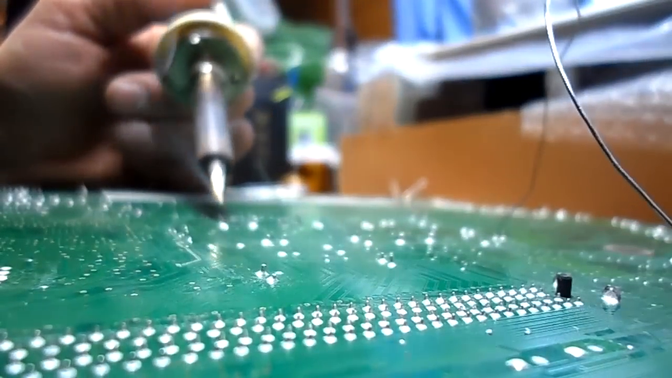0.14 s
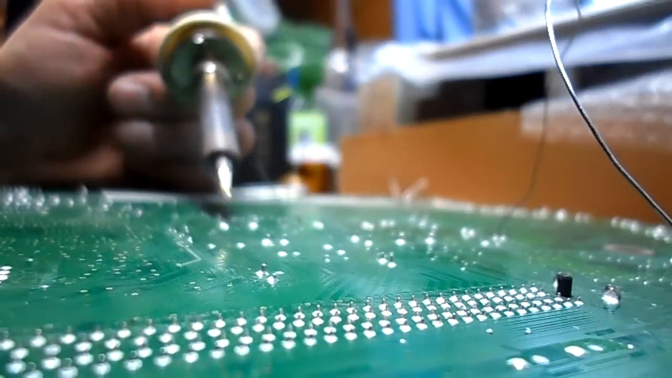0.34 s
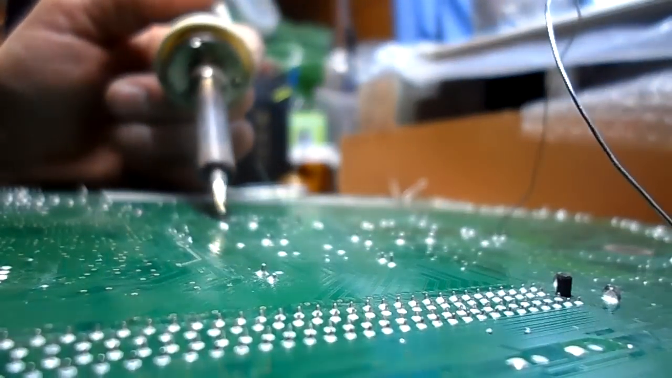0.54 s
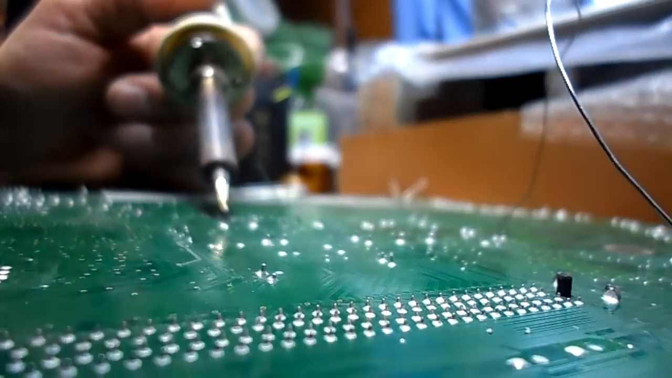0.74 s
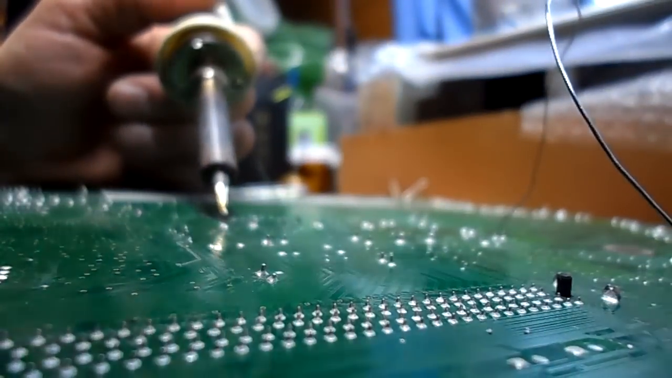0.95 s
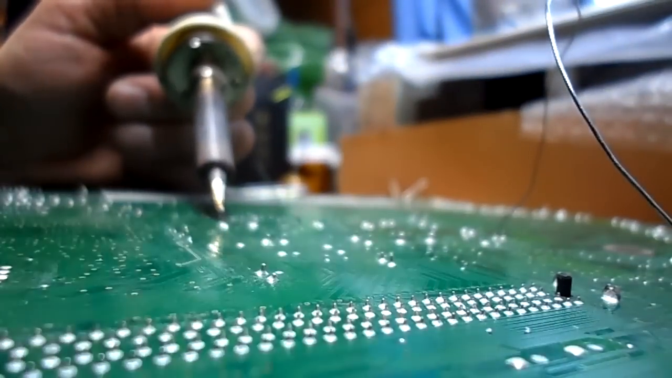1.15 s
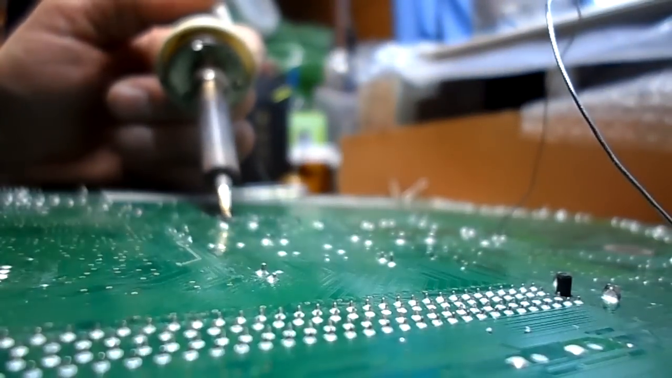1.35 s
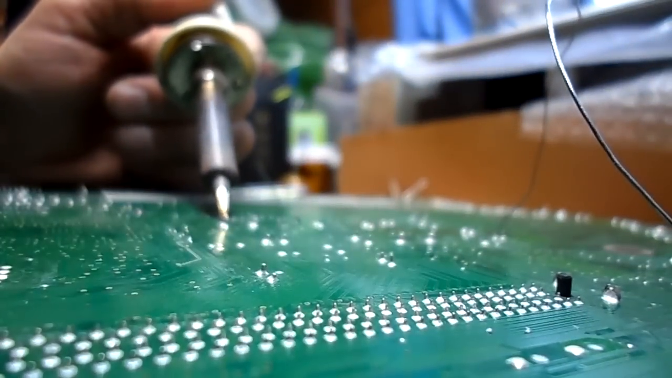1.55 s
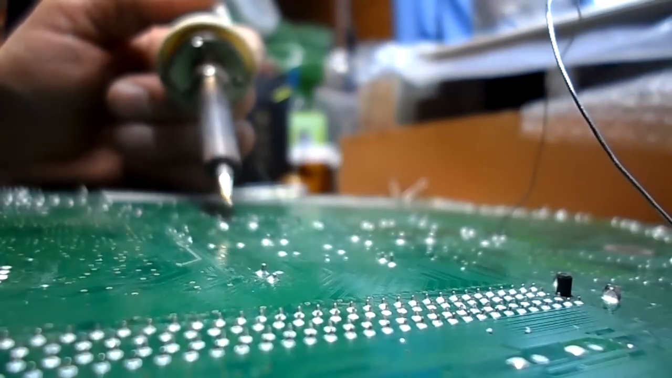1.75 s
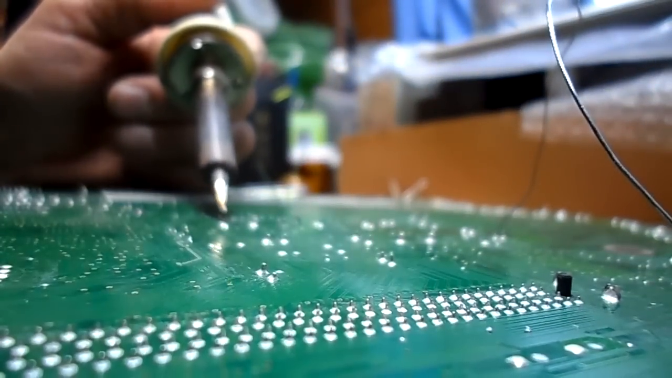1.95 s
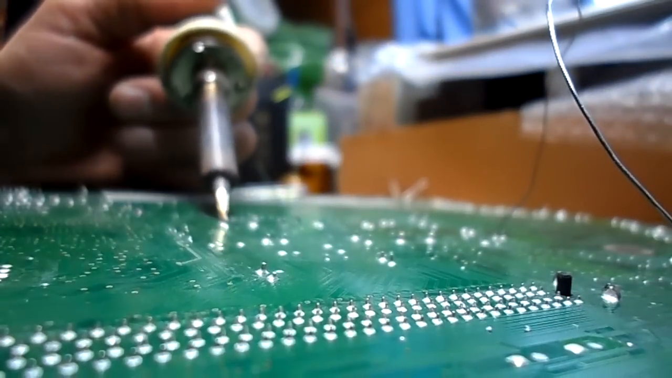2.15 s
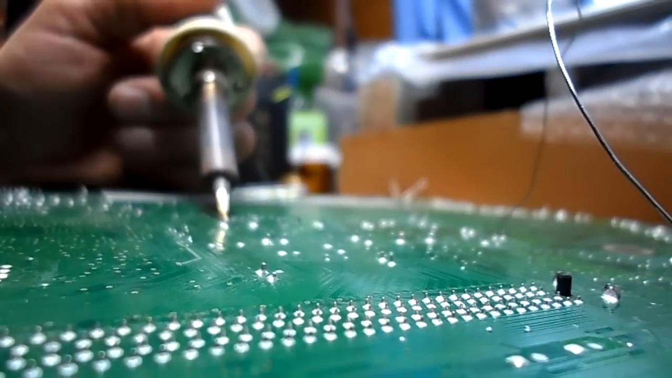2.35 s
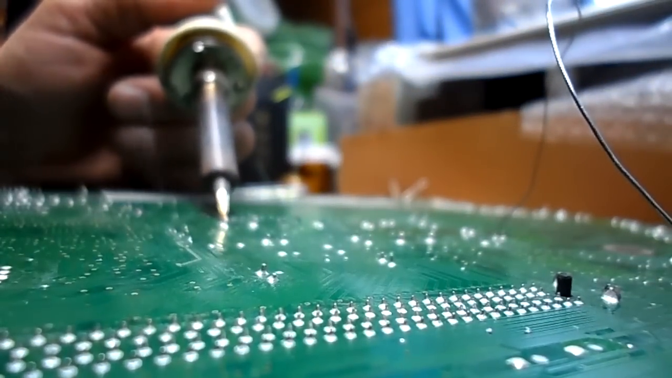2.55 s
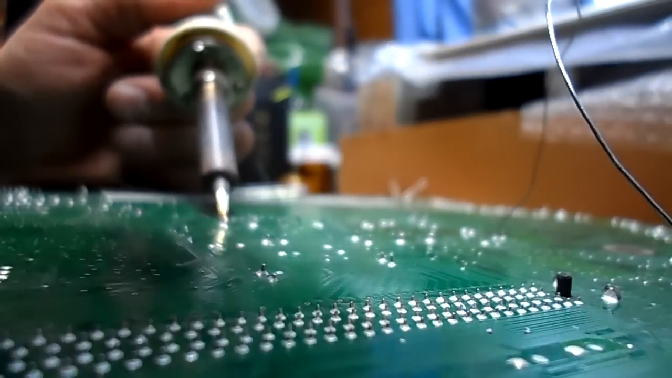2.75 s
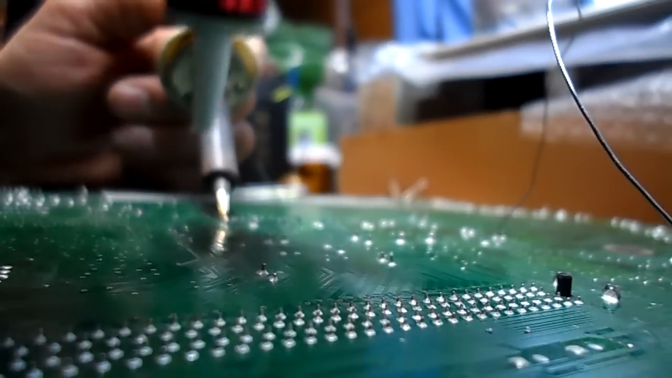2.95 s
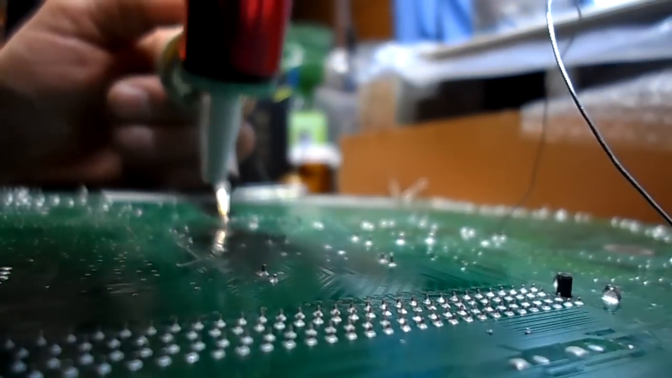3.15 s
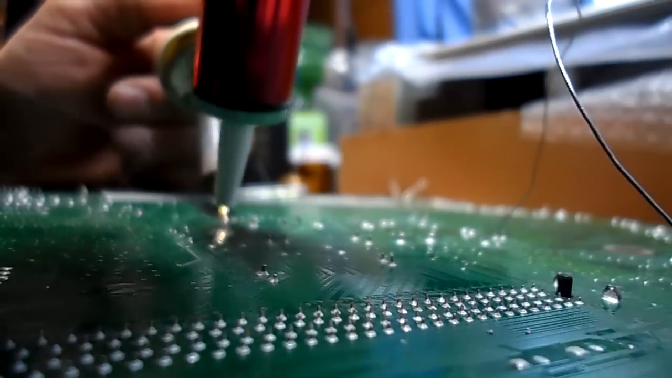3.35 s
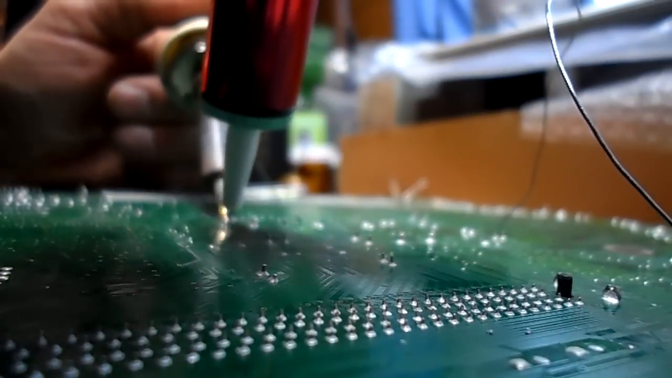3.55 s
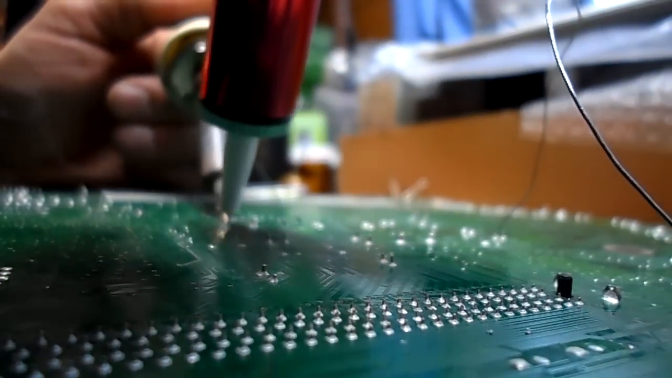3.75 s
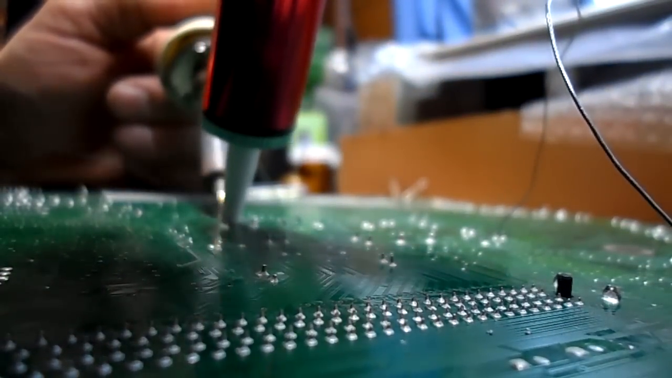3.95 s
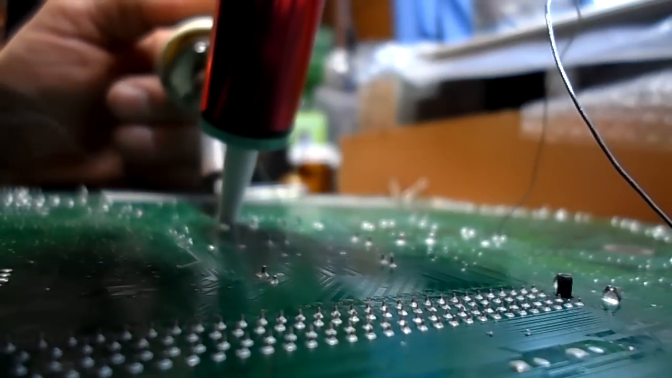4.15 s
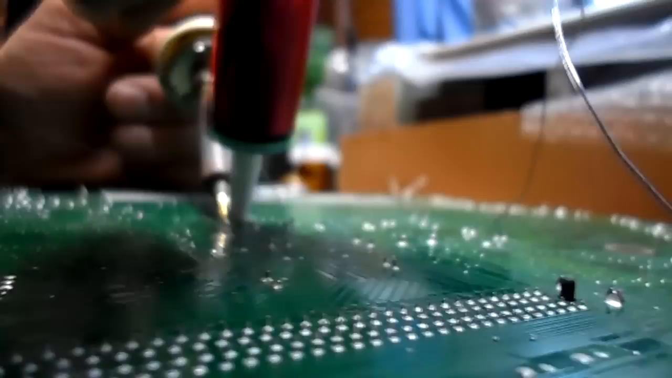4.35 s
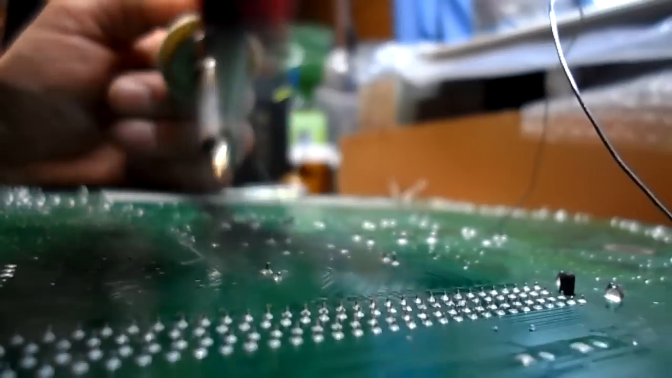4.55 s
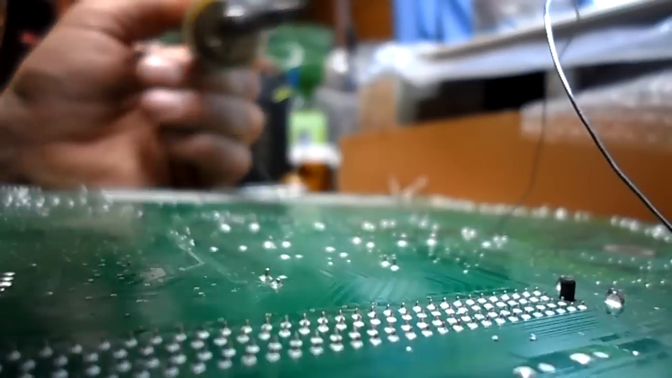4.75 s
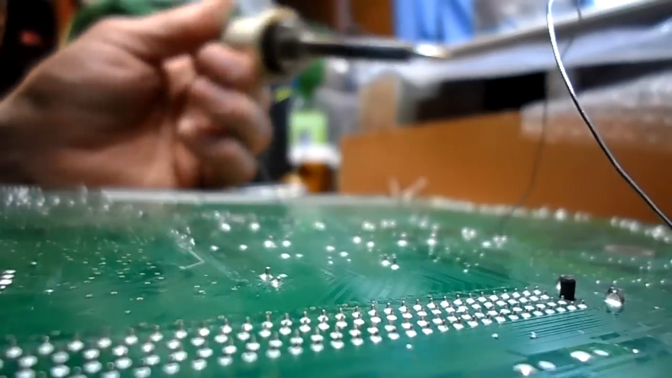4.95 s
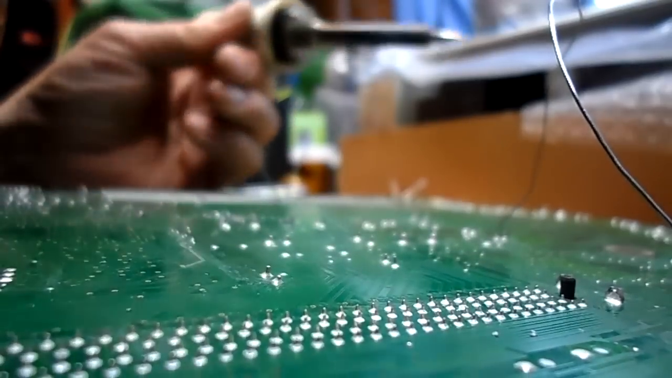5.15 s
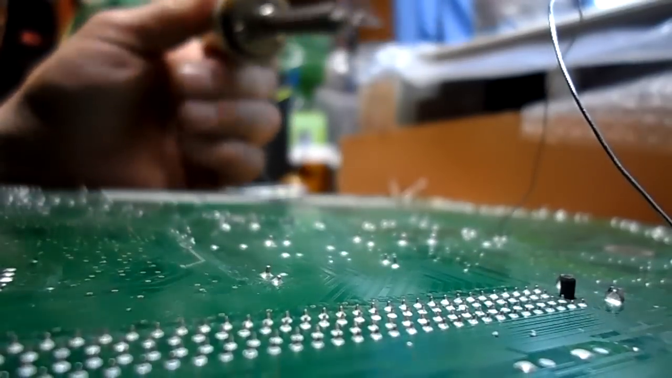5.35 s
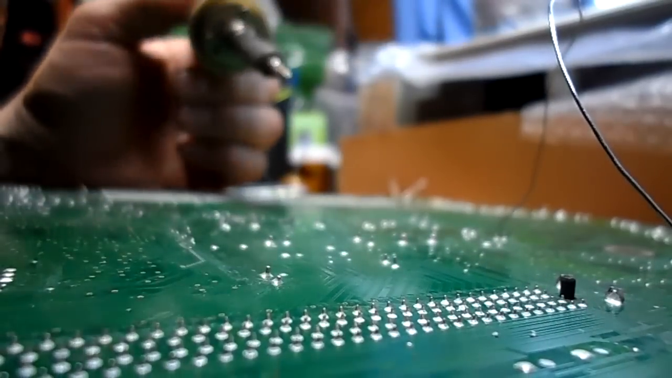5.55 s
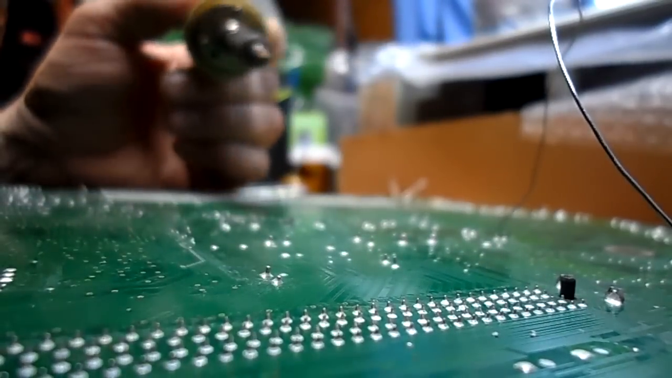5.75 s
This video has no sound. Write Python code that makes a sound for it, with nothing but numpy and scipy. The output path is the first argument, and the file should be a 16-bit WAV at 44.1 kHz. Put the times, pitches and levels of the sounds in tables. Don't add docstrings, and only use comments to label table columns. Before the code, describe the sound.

Workbench handling heard very near: dry ticks, soft skin rubs and small scuffs over a transformer-like hum. A tool clicks, then a plunger scrapes into its latch. Near-silence apart from hum precedes one explosive, rattling snap with a short puff of air. The recorder's level drops and slowly recovers while rubbing, ticks and a small bump lead to a bright plastic switch click.

```python
import sys
import numpy as np
from scipy import signal
from scipy.fft import rfft, irfft
from scipy.io import wavfile
from scipy.ndimage import uniform_filter1d

SR = 44100
rng = np.random.default_rng(int(sys.argv[2]) if len(sys.argv) > 2 else 0)


def rack_gain(trim_db):
    fader = np.asarray(trim_db, float)
    return 10 ** (fader / 20)


def master_out(mix):
    frames = np.transpose(np.atleast_2d(mix))
    ceiling = np.clip(frames, -1, 1)
    pcm = np.round(ceiling * 32767).astype(np.int16)
    wavfile.write(sys.argv[1], SR, pcm)


N = 255358


def spring_snap():
    # (time [s], crack [dB], knock [dB], thud [dB])
    blows = [(4.5032, -46, -40, -32), (4.504, -26, -14, -26), (4.5051, -27, -14, -26),
             (4.5058, -27, -15, -30), (4.5069, -26, -9, -32), (4.5075, -10, -20, -30),
             (4.5086, -21, -30, -34), (4.5113, -23, -24, -32), (4.5137, -25, -36, -36),
             (4.5155, -11, -17, -24), (4.5165, -17, -25, -32), (4.5214, -30, -23, -28),
             (4.5225, -25, -30, -34), (4.5277, -29, -33, -32), (4.5354, -31, -32, -28),
             (4.544, -38, -42, -34), (4.5578, -39, -35, -40), (4.563, -44, -48, -42),
             (4.567, -45, -50, -44)]
    # (frequency [Hz], width [Hz], level [dB])
    crack_modes = [(3300, 190, -7), (5300, 1500, -4), (7000, 380, -0.5), (8500, 1300, -2),
                   (10500, 1400, -1), (11600, 600, 0), (14000, 2500, -9)]
    # (frequency [Hz], width [Hz], level [dB])
    knock_modes = [(500, 170, -1), (1020, 390, -4), (1900, 680, -1), (2700, 1050, 0), (3600, 900, -1),
                   (5200, 1270, -4)]
    # (frequency [Hz], width [Hz], level [dB])
    thud_modes = [(35, 43, 0.5), (110, 69, 3.5), (181, 81, -1), (330, 77, -2), (480, 200, -3)]
    # (peak time [s], rise [s], fall [s], level [dB])
    rushes = [
        (4.507, .003, .026, -26),
        (4.53, .012, .025, -42),
        (4.575, .02, .06, -68),
    ]
    # (peak time [s], rise [s], fall [s], level [dB])
    shakes = [
        (4.518, 0.013, 0.048, -40.5),
        (4.57, 0.036, 0.076, -68.5),
    ]
    out = np.zeros(N)
    for row in rushes:
        add(out, *rattle(row, crack_modes + [(1800, 1500, -8)], per_s=10000, spread_db=3.0, order=1))
    for row in shakes:
        add(out, *rattle(row, thud_modes + knock_modes, per_s=5400, spread_db=2.4, order=1))
    for s, crack_db, knock_db, thud_db in blows:
        add(out, s, rack_gain(crack_db) * ring(crack_modes, 0.0005))
        add(out, s, rack_gain(knock_db) * ring(knock_modes, 0.0001))
        add(out, s, rack_gain(thud_db - 6) * ring(thud_modes, 0.001))
    return out


def latch_scrape():
    # (time [s], level [dB], start frequency [Hz], end frequency [Hz], length [s])
    squeals = [
        (2.1163, -26, 7400, 6600, .0105),
        (2.119, -32, 8300, 8700, .013),
        (2.1163, -40, 2400, 2900, .005),
    ]
    # (peak time [s], rise [s], fall [s], pressure [dB])
    scrapes = [
        (2.1125, 0.0011, 0.009, -42),
        (2.118, .002, 0.0065, -24.5),
        (2.122, 0.005, 0.011, -28),
        (2.128, .002, 0.0023, -27),
        (2.132, .002, 0.003, -34),
        (2.136, 0.0055, 0.015, -50),
    ]
    # (frequency [Hz], width [Hz], level [dB])
    barrel_modes = [(2675, 480, -0.5), (4100, 1450, -1.5), (5600, 710, 5), (7000, 480, 12.5),
                    (8500, 515, 6.5), (10500, 1100, -8.5)]
    # (time [s], peak [dB], body frequency [Hz], bright frequency [Hz], bright share [dB])
    teeth = [
        (2.119, -43, 2840, 7000, -10),
        (2.1268, -24, 3220, 7000, -0.5),
        (2.1285, -15.5, 3190, 8300, 5),
        (2.1305, -24.5, 8400, 10500, -3.5),
        (2.132, -26, 9000, 11500, -2),
        (2.136, -36.5, 8830, 10500, -2),
    ]
    out = np.zeros(N)
    for s, *colour in squeals:
        add(out, s, slide(*colour))
    for row in scrapes:
        add(out, *rattle(row, barrel_modes, per_s=15000, spread_db=1.5, order=2))
    for s, *colour in teeth:
        add(out, s, tick(*colour))
    return out


def switch():
    # (time [s], plastic ring [dB], crack [dB])
    bounces = [
        (5.67212, -9, -21),
        (5.67282, -16, -21),
        (5.67317, -15, -17),
        (5.67422, -17, -20),
        (5.6749, -30, -21),
        (5.6756, -40, -25),
    ]
    # (time [s], peak [dB], frequency [Hz], decay t60 [s])
    crack_rings = [
        (5.6732, -19, 6800, .011),
        (5.6722, -25, 3800, .011),
        (5.6732, -26, 5060, .011),
        (5.6735, -26, 10750, .011),
        (5.6742, -26, 8330, .01),
        (5.6722, -31, 2380, .012),
    ]
    contact_modes = [(3800, 600, 6), (5100, 700, 0), (6800, 600, 5),
                     (8300, 900, 3), (9500, 800, -1), (10700, 600, -2)]
    out, t = np.zeros(N), np.arange(1500) / SR
    case = np.sin(2 * np.pi * 2960 * t) * np.exp(-t / 0.0008) * (1 - np.exp(-t / 0.00006))
    low = rack_gain(-6) * np.sin(2 * np.pi * 800 * t) * np.exp(-t / 0.0001878)
    for s, ring_db, crack_db in bounces:
        add(out, s, rack_gain(ring_db) * (case + low))
        add(out, s, rack_gain(crack_db) * ring(contact_modes, 0.00025))
    for s, *mode in crack_rings:
        add(out, s, bump(*mode))
    add(out, 5.67335, np.array([-0.5, 1, -0.5]))
    return signal.sosfilt(signal.butter(2, 600, "high", fs=SR, output="sos"), out)


def handling():
    return rubs() + drags() + ticks() + scuffs() + skin_slides() + bumps()


def rubs():
    # (peak time [s], rise [s], fall [s], pressure [dB], dull share [dB])
    early = [(.005, .01, 0.27, -74.5, -4), (.3, 0.13, 0.13, -59.5, -10), (.535, 0.012, 0.41, -70.5, -5.5),
             (.69, 0.66, 0.25, -71, -6), (.986, 0.0934, 0.0859, -73, -3), (1.17, 0.089, 0.11, -72, -3),
             (1.48, 0.28, 0.084, -71.5, 1), (1.62, 0.082, 0.03, -67.5, -2),
             (1.712, 0.0062, 0.097, -62.5, 7), (1.85, 0.16, 0.16, -57, -2.5), (2.0, 0.16, 0.66, -72, 2),
             (2.145, .005, 0.2, -69.5, -8.5), (2.225, 0.06, 0.05, -57, -14.5), (2.49, 0.16, .1, -80, -22),
             (2.564, 0.0485, 0.14, -78.5, 4), (2.874, 0.2702, 0.1609, -80, 3),
             (3.05, 0.0904, 0.19, -80, -2)]
    # (peak time [s], rise [s], fall [s], pressure [dB], dull share [dB])
    late = [(4.86, .2, 0.19, -81.5, -5), (4.945, 0.013, 0.081, -65, -32.5), (5.0, 0.11, 0.16, -67.5, -16),
            (5.07, 0.04285, 0.0615, -66.5, -13), (5.27, 0.16, 0.02653, -68.5, 1),
            (5.291, 0.00397, 0.073, -55.5, -5), (5.41, 0.14, 0.1106, -68, -9),
            (5.474, 0.00339, 0.082, -72.5, 10), (5.55, 0.16, 0.18, -63.5, 8.5),
            (5.65, 0.074, 0.038, -60, -4.5), (5.69, .01, 0.11, -75, 0)]
    # (frequency [Hz], width [Hz], level [dB])
    skin = [(1340, 1100, -12.5), (2917, 540, -1.5), (3900, 820, -0.5), (4800, 1100, 1), (6700, 890, 0.5)]
    rows = early + late
    t = np.linspace(0, N / SR, N // 32)
    presses = [stroke(t, *row[:4], order=2) for row in rows]
    dull_presses = [rack_gain(row[4]) * press for row, press in zip(rows, presses)]
    fine_t = np.arange(N) / SR
    pressure = np.interp(fine_t, t, sum(presses))
    dullness = np.interp(fine_t, t, sum(dull_presses))
    bright_hz = 9740 + 33.5 * (20 * np.log10(pressure + 1e-5) + 60)
    slips, lumps = rng.standard_normal((2, N))
    slips = slips * rack_gain(1.6 * evened(uniform_filter1d(lumps, size=120)))
    dull = sum(rack_gain(db) * patchy(resonate(slips, hz, width), 3.0) for hz, width, db in skin)
    bright = patchy(steep(slips, 0.87 * bright_hz, 3000), 2.2)
    bright = bright - patchy(steep(slips, 1.22 * bright_hz, 2200), 2.8)
    bright = bright + rack_gain(-9) * steep(slips, 13300, 4500)
    return dullness * evened(dull) + pressure * evened(bright)


def drags():
    # (peak time [s], rise [s], fall [s], pressure [dB])
    drag_strokes = [
        (0.051, 0.0036, 0.012, -45.5),
        (.1, 0.051, 0.057, -56),
        (.245, 0.077, 0.067, -59.5),
        (0.332, 0.097, 0.00512, -60.5),
        (2.285, 0.043, 0.053, -65),
        (4.87, 0.028, 0.039, -65),
        (5.291, 0.0051, 0.03, -48),
        (5.34, .045, 0.055, -55),
    ]
    # (frequency [Hz], width [Hz], level [dB])
    far_modes = [(465.31, 220, -7), (1028, 90, 9), (1542, 117, 11.5), (2030, 210, 8), (2500, 270, 3),
                 (3400, 420, 1.5), (4800, 360, 2), (6060, 640, -0.5), (8500, 1100, -4)]
    # (frequency [Hz], width [Hz], level [dB])
    near_modes = [(150, 253, 2), (447, 300, 2.5), (890, 64, 1), (1300, 381.6, -10.5), (2100, 360, -8),
                  (4600, 1400, -11)]
    out = np.zeros(N)
    for row in drag_strokes:
        modes = far_modes if row[0] < 5.1 else near_modes
        add(out, *rattle(row, modes, per_s=9000, spread_db=3.8, order=2))
    return out


def ticks():
    # (time [s], peak [dB], body frequency [Hz], bright frequency [Hz], bright share [dB])
    early = [(0.0493, -35, 1900, 8500, 2), (0.2994, -31, 2850, 9300, 2), (0.591, -49, 4600, 8000, -13),
             (0.776, -42, 7000, 10500, 0), (0.7903, -31.5, 4300, 9300, 8), (0.7968, -28, 3300, 5600, 0.5),
             (0.7968, -26.5, 8500, 10400, 4), (0.7986, -34, 5000, 9500, 0), (.987, -56, 4500, 8000, 3),
             (0.881, -41, 5030, 2600, -12), (0.9106, -38, 3600, 10000, 0), (0.956, -48.5, 4500, 8900, 1),
             (1.7095, -44, 1900, 3960, -6), (1.899, -40, 5000, 9500, -8), (1.9062, -18, 3100, 9200, 3.5),
             (1.9066, -25, 6700, 9200, -3), (1.9069, -28, 2700, 8500, 0), (1.908, -28, 3000, 8600, 2),
             (1.912, -36, 3135, 8000, 2), (2.272, -50, 4800, 6000, 0), (2.2784, -46, 2900, 3700, 3),
             (2.285, -47, 3800, 6200, -3), (2.493, -50, 9000, 11500, 0), (2.303, -50, 2686, 1500, -8),
             (2.4787, -46, 7000, 8200, 0), (2.4788, -55, 2530, 4000, -6), (4.076, -50, 3700, 7000, -4)]
    # (time [s], peak [dB], body frequency [Hz], bright frequency [Hz], bright share [dB])
    late = [(4.646, -61, 2252, 5000, -3.5), (4.869, -35, 4100, 7200, 0), (4.87, -38, 3400, 5100, 4),
            (4.9465, -42.5, 5300, 8150, 4.5), (5.058, -39.5, 3100, 5600, 6), (5.0813, -38, 2600, 4900, 3),
            (5.1414, -30.5, 9500, 15480, 0), (5.196, -48, 9050, 12000, -5), (5.2023, -45.5, 5000, 9000, 0),
            (5.3516, -35.5, 1800, 4400, 10), (5.365, -42, 7000, 10000, -6),
            (5.4745, -39.5, 3200, 9500, -12.5), (5.598, -42, 2860, 4000, 0), (5.612, -45, 2860, 4000, 0),
            (5.6306, -31, 5000, 8300, 3), (5.6306, -36, 10500, 13500, -3), (5.163, -50, 7000, 10500, 0)]
    out = np.zeros(N)
    for s, *colour in early + late:
        add(out, s, tick(*colour))
    return out


def scuffs():
    # (time [s], level [dB], body frequency [Hz], bright frequency [Hz], length [s])
    broad = [(1.9026, -36, 4000, 9400, 0.0031), (.0478, -45.5, 1700, 5000, 0.0047),
             (.318, -57, 7500, 10000, 0.012), (0.755, -57.5, 8500, 10500, 0.028),
             (1.004, -57, 7000, 9984, 0.023), (1.01, -49, 9200, 10340, 0.016),
             (1.45, -66, 8500, 10500, 0.058), (1.558, -63, 7460, 10540, 0.059),
             (2.558, -70, 2500, 9000, 0.039), (4.695, -73.5, 2780, 7000, 0.011),
             (4.73, -70.5, 2850, 7350, 0.016), (5.09, -54, 3060, 8500, 0.0089)]
    # (time [s], level [dB], body frequency [Hz], bright frequency [Hz], length [s])
    squeaks = [
        (.728, -63.5, 5437, 5437, 0.025),
        (2.14, -61, 3300, 4100, 0.03),
        (2.227, -74, 3900, 5100, 0.201),
        (2.8, -70, 2750, 2900, 0.12),
        (2.82, -70, 5500, 7200, 0.09),
        (4.587, -80, 6250, 6250, 0.053),
        (5.252, -68, 3950, 4378, 0.012),
        (5.355, -67.5, 4496, 5300, 0.074),
    ]
    out = np.zeros(N)
    for rows, width_hz in ((broad, 2350), (squeaks, 600)):
        for s, *colour in rows:
            add(out, s, scuff(*colour, width_hz))
    return out


def skin_slides():
    # (time [s], level [dB], start frequency [Hz], end frequency [Hz], length [s])
    glides = [(1.712, -59, 11200, 10200, .09), (1.79, -58.5, 10000, 9300, 0.098),
              (1.72, -62, 3200, 5000, .07), (1.84, -66, 4800, 5300, .06), (4.948, -66, 10900, 8600, 0.054),
              (5.7, -69, 9500, 9000, .035), (5.472, -59.5, 3400, 4200, .085), (5.49, -66, 10000, 9400, .08),
              (5.585, -63.5, 2800, 3300, 0.037), (.066, -61, 1130, 2300, .042),
              (.118, -65, 3300, 3300, .018), (.315, -52, 2900, 2000, .017), (.316, -55, 3800, 3500, .012),
              (1.013, -58, 6900, 6800, .012), (1.012, -66, 4500, 4500, .014), (2.21, -62, 7200, 6800, .025),
              (2.215, -62, 8100, 8300, .04), (2.42, -70, 7200, 7600, .025), (2.32, -70, 7200, 7100, .035),
              (5.16, -68, 10000, 9800, .022), (5.19, -72, 2900, 2900, .03), (5.68, -63, 2900, 2900, .06),
              (5.677, -51, 8500, 7000, .014), (2.126, -44, 3000, 2500, .009)]
    out = np.zeros(N)
    for s, *colour in glides:
        add(out, s, slide(*colour))
    return out


def bumps():
    # (time [s], peak [dB], frequency [Hz], decay t60 [s])
    bump_rows = [(0.259, -34.5, 59.13, 0.049), (.41, -68, 738, 0.219), (0.88, -40, 2350, 0.021),
                 (.881, -45.5, 2880, 0.018), (.66, -60, 720, 0.34), (0.678, -48, 215, 0.14),
                 (1.79, -66, 696, 0.76), (1.98, -60, 720, 0.12), (2.116, -34.5, 330, 0.07),
                 (2.123, -32.5, 197, 0.022), (2.127, -36.5, 58, 0.056), (4.074, -50, 60, 0.12),
                 (1.906, -48, 900, .04), (5.19, -55, 140, .12), (4.5036, -26, 402, 0.028),
                 (4.514, -35, 200, 0.052), (4.555, -35.5, 30.6, 0.17), (4.57, -47, 150, 0.11),
                 (4.625, -50.5, 46, 0.35), (4.721, -47.5, 21.8, 0.65), (5.078, -62, 513, 0.0825),
                 (5.288, -43, 890, 0.0407), (2.126, -41, 1105, 0.019), (2.095, -53, 726, 0.047),
                 (4.66, -66.5, 667, 0.0782), (5.336, -40, 188, 0.031), (5.353, -36.5, 110, 0.044)]
    out = np.zeros(N)
    for s, *mode in bump_rows:
        add(out, s, bump(*mode))
    return out


def rattle(row, modes, per_s, spread_db, order):
    peak_s, rise_s = row[:2]
    t = peak_s - rise_s + np.arange(9000) / SR
    size = rack_gain(spread_db * np.minimum(rng.exponential(1, 9000), 3)) * rng.standard_normal(9000)
    slips = size * (rng.random(9000) < per_s / SR)
    return t[0], stroke(t, *row, order) * evened(body(slips, modes))


def ring(modes, blur_s):
    t = np.arange(4000) / SR
    blow = rng.standard_normal(4000) * np.exp(-t / blur_s) + 3 * (t == 0)
    out = body(blow, modes)
    return out / abs(out).max()


def tick(db, low_hz, high_hz, bright_db):
    width = min(0.55 * low_hz, 2200)
    t = np.arange(1500) / SR
    grit = rack_gain(-13.5) * rng.standard_normal(1500) * np.exp(-t / 0.00096)
    blow = (t == 0) + grit
    out = evened(steep(blow, low_hz, width))
    out = out + rack_gain(bright_db) * evened(steep(blow, high_hz, min(2 * width, 2600)))
    out = out - rack_gain(-3) * evened(steep(blow, (low_hz + high_hz) / 2, 1.2 * width))
    out = out + rack_gain(-16.5) * evened(blow)
    floor_hz = 0.7 * min(low_hz, high_hz)
    out = signal.sosfilt(signal.butter(4, floor_hz, "high", fs=SR, output="sos"), out)
    return rack_gain(db) * out / abs(out).max()


def scuff(db, low_hz, high_hz, length_s, width_hz):
    slips = rng.standard_normal(6000)[:int(length_s * SR)]
    bands = evened(steep(slips, low_hz, width_hz)) + evened(steep(slips, high_hz, 0.62 * width_hz))
    return rack_gain(db) * evened(bands) * signal.windows.tukey(len(slips), 0.6)


def slide(db, from_hz, to_hz, length_s):
    slips, lumps = rng.standard_normal((2, 6000))[:, :int(length_s * SR)]
    slips = slips * rack_gain(2.5 * evened(uniform_filter1d(lumps, size=60)))
    band = steep(slips, np.linspace(from_hz, to_hz, len(slips)), 0.12 * from_hz + 200)
    return rack_gain(db) * evened(band) * signal.windows.tukey(len(slips), 0.4)


def bump(db, hz, t60):
    t = np.arange(12000) / SR
    return rack_gain(db - 60 * t / t60) * np.sin(2 * np.pi * hz * t) * (1 - np.exp(-t * hz / 0.11))


def stroke(t, peak_s, rise_s, fall_s, db, order):
    away = np.where(t < peak_s, (peak_s - t) / rise_s, (t - peak_s) / fall_s)
    return rack_gain(db - np.minimum(20 * away ** order, 200))


def patchy(x, depth_db):
    slow = uniform_filter1d(uniform_filter1d(rng.standard_normal(len(x)), size=700), size=400)
    return x * rack_gain(depth_db * evened(slow))


def resonate(x, hz, width):
    turn = np.exp(2j * np.pi * np.cumsum(hz * np.ones(len(x))) / SR)
    r = np.exp(-np.pi * width / SR)
    return 2 * (turn * signal.lfilter([1 - r], [1, -r], x / turn)).real


def steep(x, hz, width):
    return resonate(resonate(x, hz, width), hz, width)


def body(x, modes):
    return sum((-1) ** k * rack_gain(db) * resonate(x, hz, width) for k, (hz, width, db) in enumerate(modes))


def evened(x):
    return x / np.sqrt(np.mean(x ** 2) + 1e-20)


def read(points, hz):
    f, value = np.transpose(points)
    return np.interp(np.log(hz + 1), np.log(f + 1), value)


def add(mix, s, sound):
    part = mix[round(s * SR):][:len(sound)]
    part += sound[:len(part)]


def room(x):
    # (frequency [Hz], decay t60 [s])
    decay = [(300, 0.04), (3000, 0.11), (9000, 0.085), (15000, 0.053)]
    taps = np.zeros(SR // 2)
    at = np.arange(130, SR // 2 - 20, 12)
    taps[at + rng.integers(0, 12, len(at))] = rng.choice([-1., 1.], len(at))
    hz, t, z = signal.stft(taps, SR, nperseg=128)
    tail = signal.istft(z * rack_gain(-60 * t / read(decay, hz)[:, None]), SR, nperseg=128)[1]
    return signal.fftconvolve(x, tail / np.linalg.norm(tail))[:N]


def hum():
    # (frequency [Hz], width [Hz], level [dB])
    motors = [(120.5, 0.5, -71), (181, 12, -68.5), (26.8, 17, -62), (720, 25, -91.5)]
    t = np.arange(N) / SR
    turn = 2 * np.pi * 249.54 * t
    waver = 1 + 0.074 * evened(resonate(rng.standard_normal(N), 4.2, 24))
    dips = sum(np.exp(-((t - s) / 0.24) ** 2) for s in (1.52, 2.635))
    sixth = rack_gain(-22.5 + 0.73 * t) * (1 - 0.6 * dips)
    third = rack_gain(-43.5) + stroke(t, peak_s=3.5, rise_s=6, fall_s=0.3, db=-35, order=2)
    tones = waver * np.sin(turn) + sixth * np.sin(6 * turn) + third * np.sin(3 * turn)
    drones = np.zeros(N)
    for hz, width, db in motors:
        narrow = resonate(resonate(rng.standard_normal(N), hz, width), hz, 3 * width)
        drones += rack_gain(db) * evened(narrow)
    hum_db = -47.5 - 2.5 * np.maximum(t - 3.03, 0)
    return np.sqrt(2) * rack_gain(hum_db) * tones + drones


def air():
    # (frequency [Hz], density [dB per Hz])
    spectrum = [(20, -16), (60, 6), (250, -2), (600, -8.5), (1100, -7.5), (2200, -16.5), (7000, -23),
                (16000, -20)]
    hz = np.fft.rfftfreq(1024, 1 / SR)
    a, b, patches = rng.standard_normal((N // 256 + 5, 513, 3)).T
    patches = uniform_filter1d(uniform_filter1d(patches, size=12, axis=0), size=14, axis=1)
    z = (a + 1j * b) * rack_gain(read(spectrum, hz)[:, None] + 1.2 * evened(patches))
    return rack_gain(-63.5) * evened(signal.istft(z, nperseg=1024, noverlap=768)[1][:N])


def leak():
    # (frequency [Hz], width [Hz], level [dB])
    hiss_bands = [(6500, 1300, -1.8), (10000, 1100, 0.1), (14670, 2000, -2)]
    pictures_per_s, burst_start, burst_share = 30, 0.92, 0.42
    on = (np.arange(N) * pictures_per_s / SR - burst_start) % 1 < burst_share
    hiss = evened(body(rng.standard_normal(N), hiss_bands))
    return rack_gain(-73) * hiss * uniform_filter1d(on * 1., size=100)


def recorder_gain():
    # (time [s], closing time [s], deepest gain [dB], recovery time constant [s])
    ducks = [
        (4.515, 0.083, -17, 0.32),
        (5.669, 0.0071, -16.5, 0.77),
    ]
    ceiling_db = 2
    t = np.arange(N) / SR
    gain_db = 1 - 0.32 * t
    for s, close_s, low_db, recover_s in ducks:
        since_closed = np.maximum(t - s - close_s, 0)
        back_db = ceiling_db + (low_db - ceiling_db) * np.exp(-since_closed / recover_s)
        gain_db = gain_db + (back_db - gain_db) * np.clip((t - s) / close_s, 0, 1)
    return rack_gain(gain_db)


def scene():
    hands, tool, click = handling(), latch_scrape() + spring_snap(), switch()
    background = (hum() + air() + leak()) * recorder_gain()
    brighter = click - 0.5 * resonate(click, 2900, 900)
    wet = room(rack_gain(-15.5) * hands + rack_gain(-24.0) * tool + rack_gain(-26.0) * brighter)
    return (background + hands + tool + click + wet)[None]


def band_limit(x):
    return signal.sosfilt(signal.butter(12, 17120, fs=SR, output="sos"), x)


def record(dry):
    # (frequency [Hz], gain [dB])
    response = [(20, 0.5), (10500, 2.5), (12000, -2.5), (14000, -2.5), (15900, -5.5), (16150, -29),
                (17000, -34), (17300, -65.5), (22050, -80)]
    x = signal.sosfilt(signal.butter(1, 18, "high", fs=SR, output="sos"), dry)
    x = 0.48 * np.tanh(x / 0.48)
    x = irfft(rfft(x) * rack_gain(read(response, np.fft.rfftfreq(N, 1 / SR))), N)
    return band_limit(x)


dry = scene()
out = record(dry)
master_out(out)
```